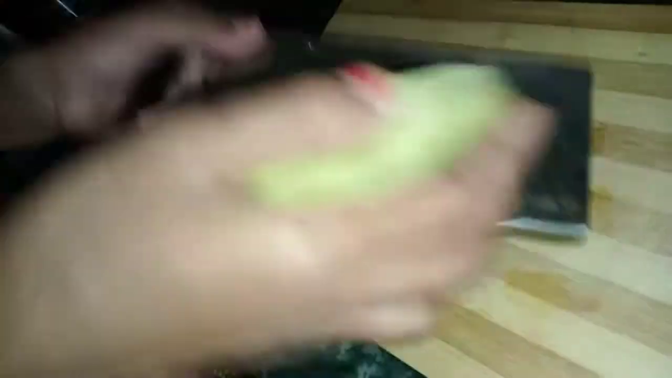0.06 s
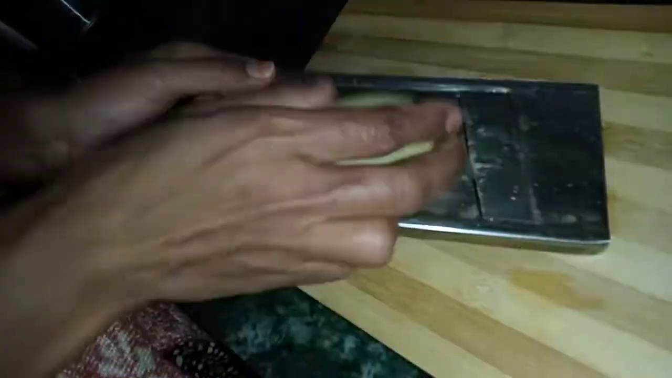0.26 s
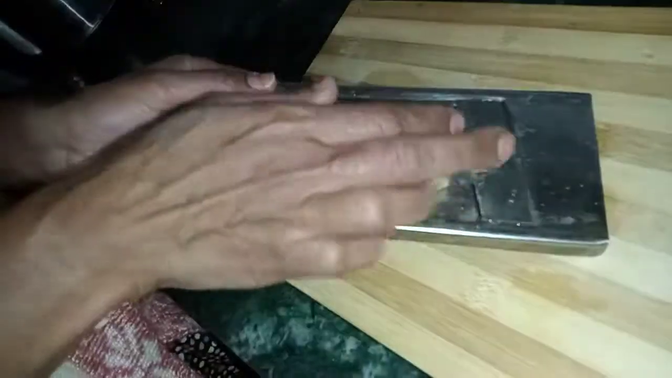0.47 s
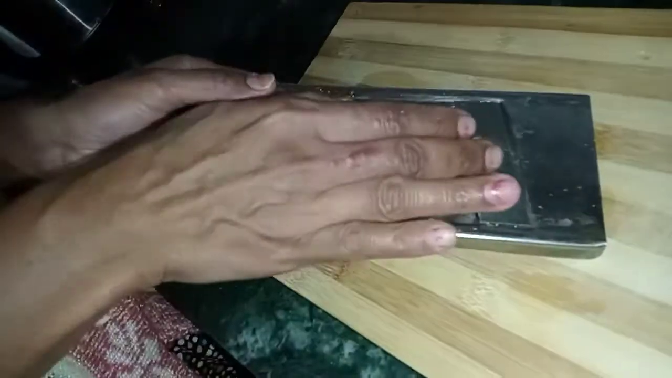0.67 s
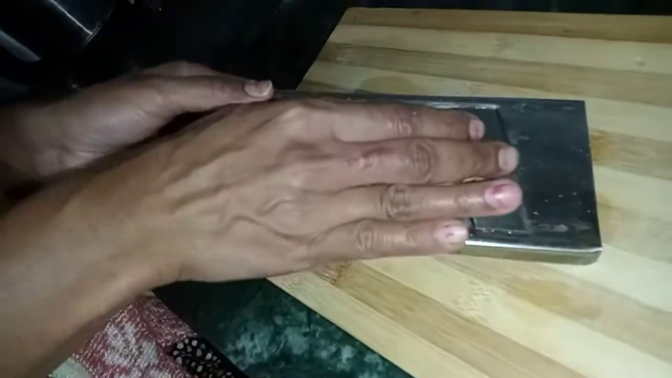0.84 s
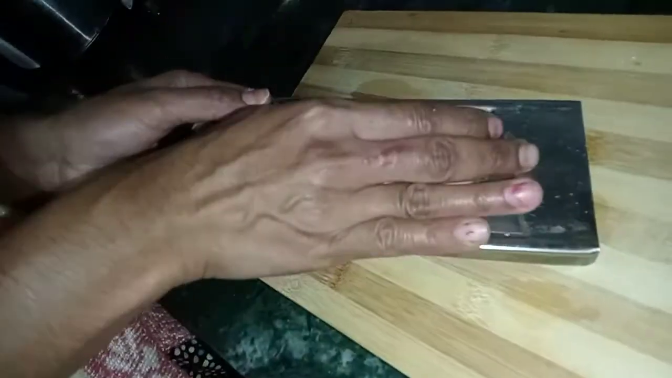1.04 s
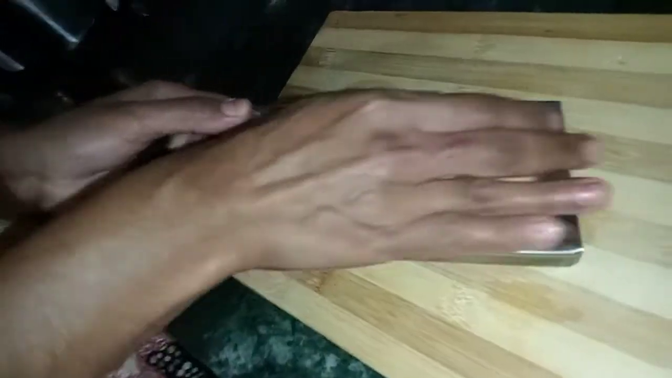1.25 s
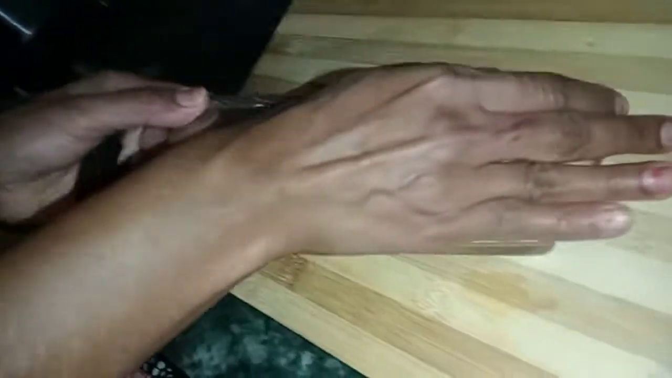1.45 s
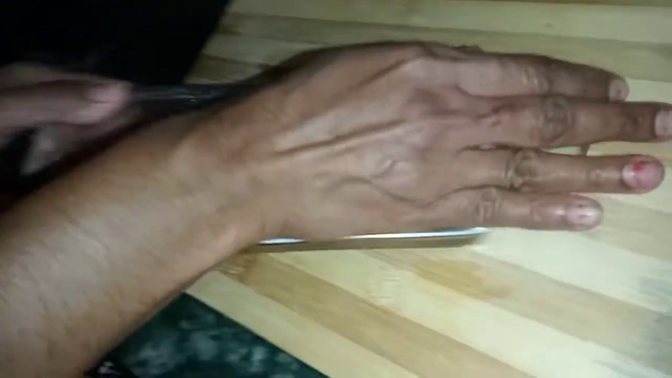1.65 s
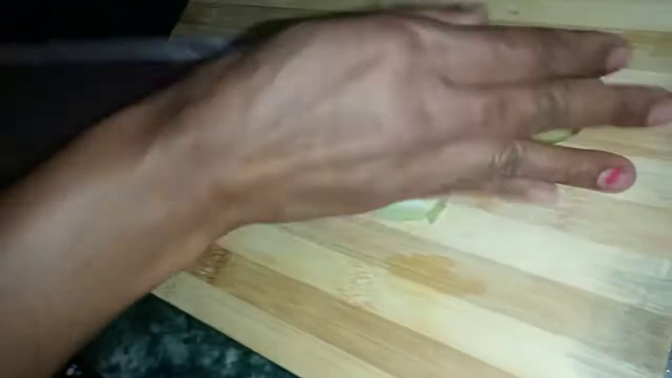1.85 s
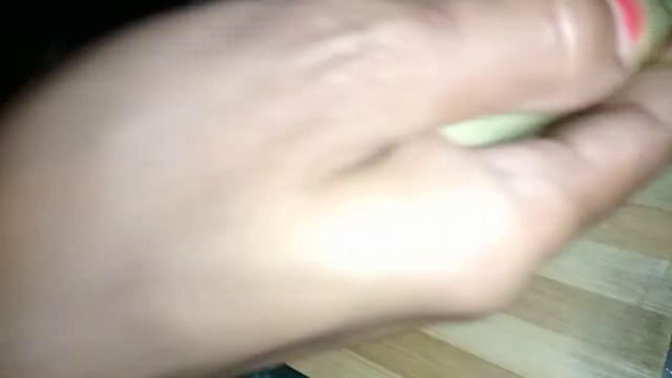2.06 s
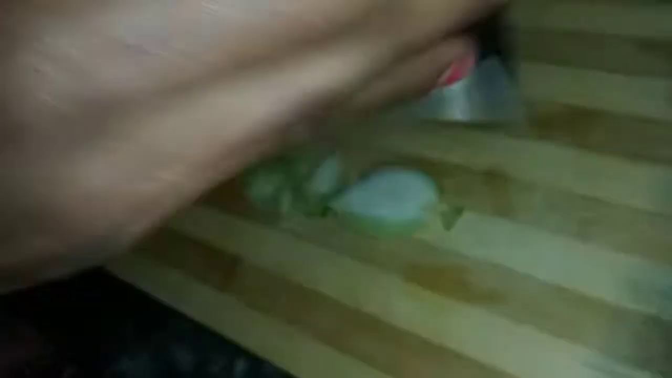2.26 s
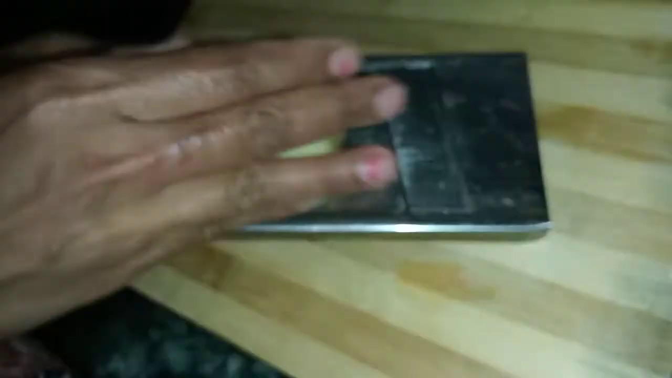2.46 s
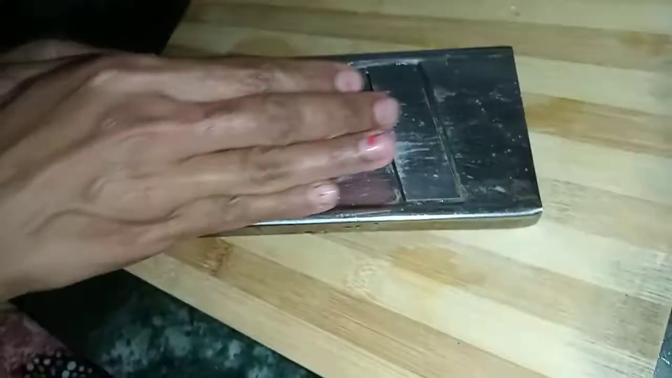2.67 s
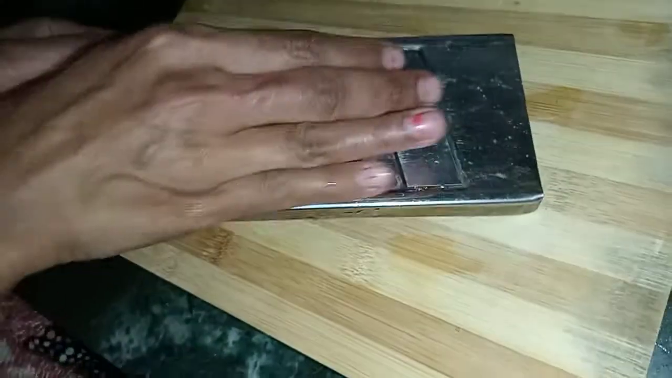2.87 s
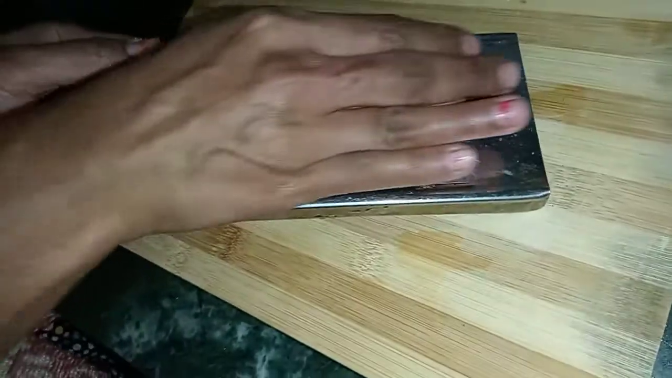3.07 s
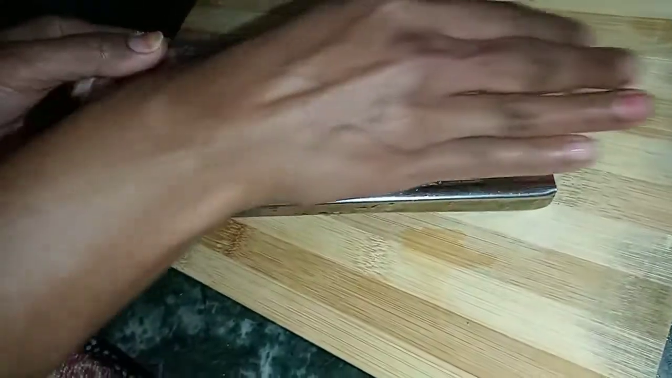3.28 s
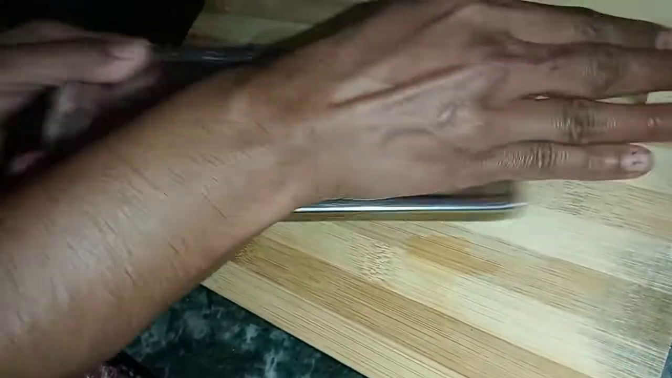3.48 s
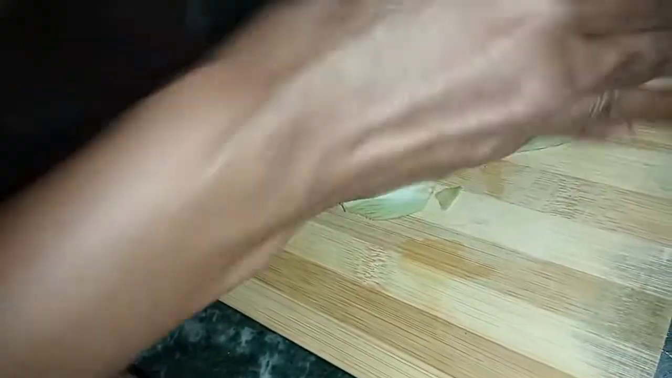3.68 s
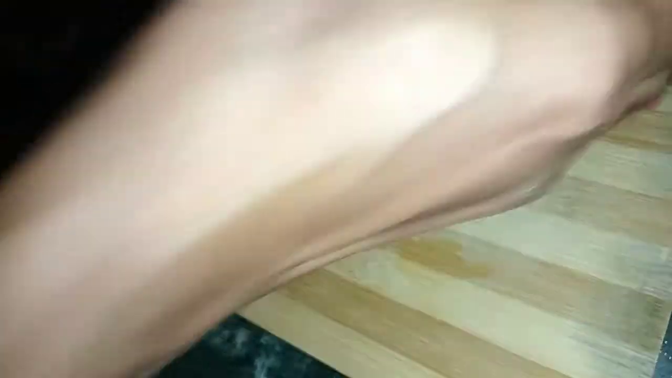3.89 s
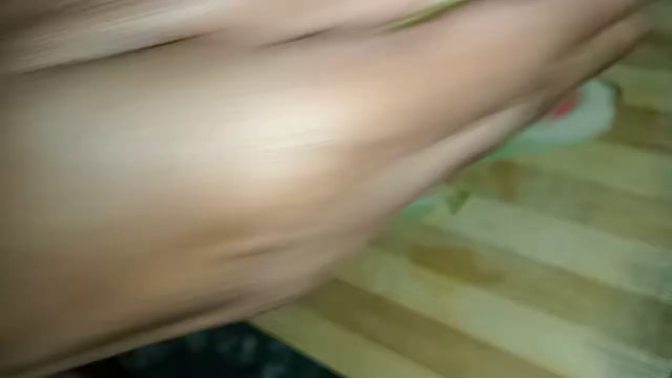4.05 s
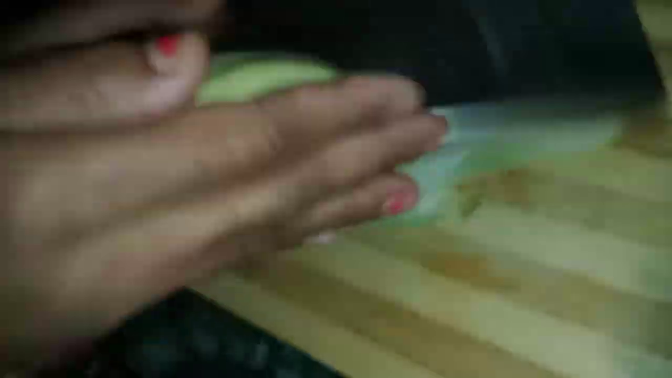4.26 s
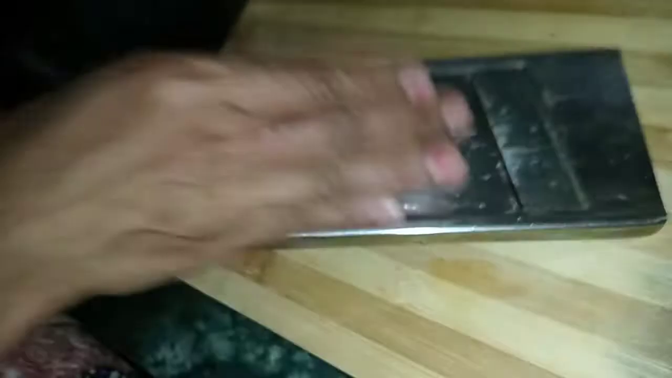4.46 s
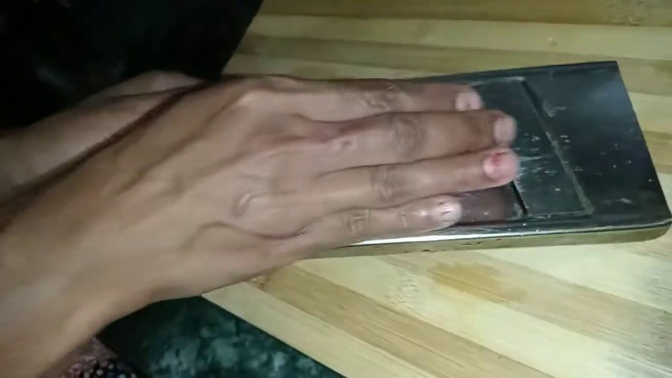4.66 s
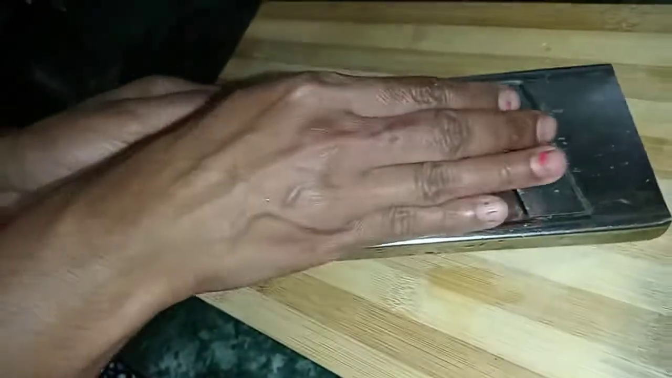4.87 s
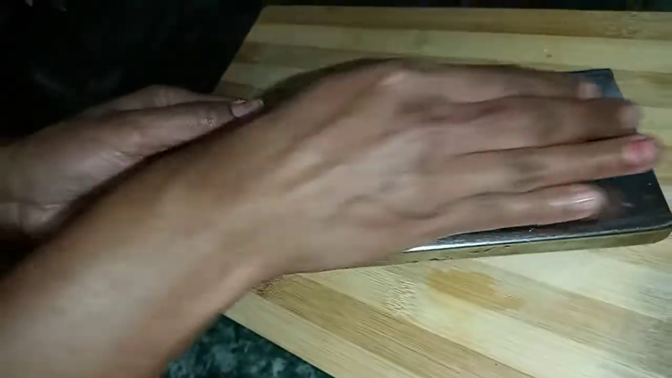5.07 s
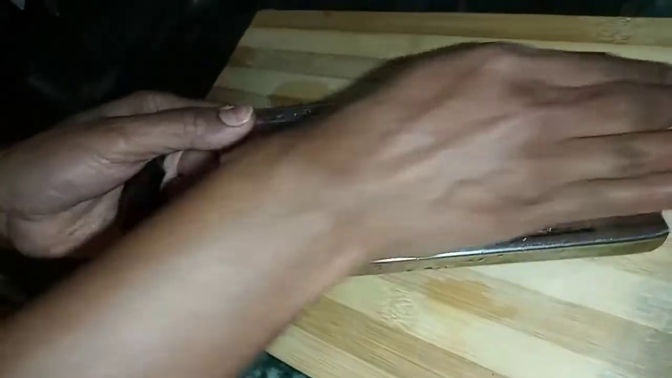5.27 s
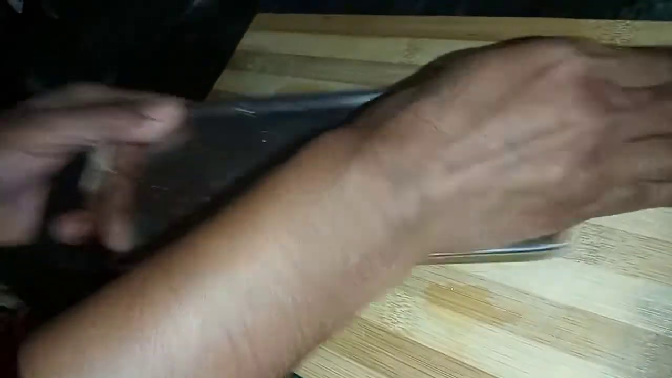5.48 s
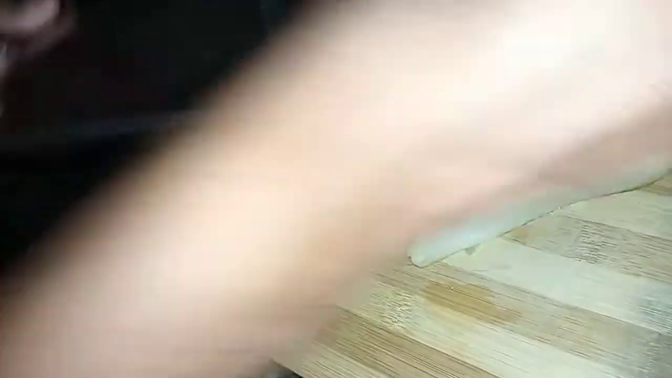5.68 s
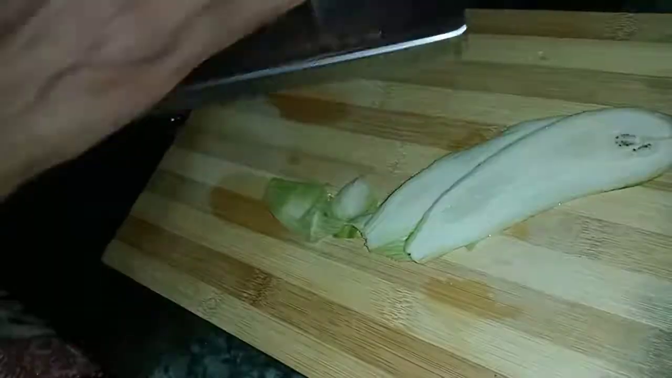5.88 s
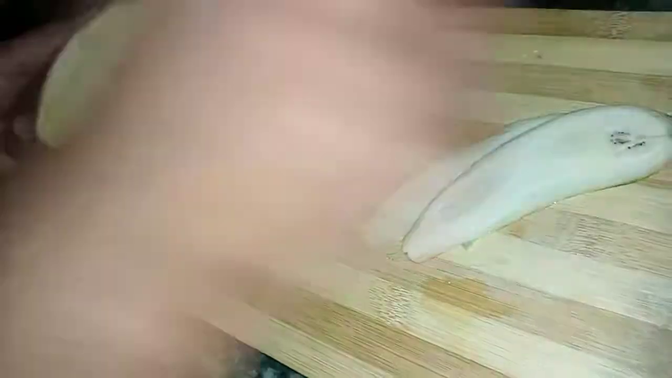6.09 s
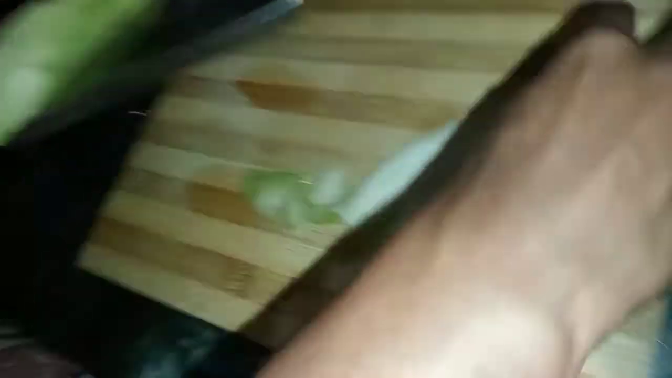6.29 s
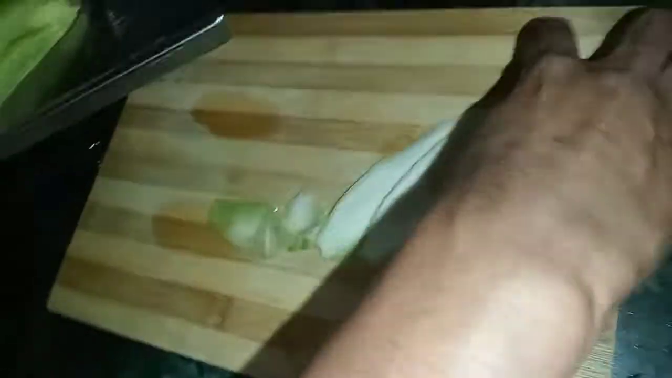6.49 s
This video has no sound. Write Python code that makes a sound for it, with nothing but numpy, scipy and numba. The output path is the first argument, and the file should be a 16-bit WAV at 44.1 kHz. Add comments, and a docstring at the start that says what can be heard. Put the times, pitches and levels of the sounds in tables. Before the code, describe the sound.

A raw banana rasps three times across a ringing steel hand slicer, with wet ticks, crunchy tears and clacking knocks over a faint throbbing fan.

```python
"""A ceiling fan throbs throughout in a small, hard kitchen; now and then fruit knocks on a steel hand slicer.
A raw banana goes over the slicer three times above a wooden board: bursting cells rasp through the ringing plate.
In two of the strokes fibres tear with a crunch through a pocket resonance of falling pitch. Wet ticks snap in and
around the strokes; soft pats, a grazed blade and rubbing fingers come mostly between them; late on, a hand bumps
the microphone. Hits and grains are shaped noise and ringing modes; the fan is coloured air, hum and wavering tone."""
import sys
import numpy as np
from scipy import signal
from scipy.fft import rfft, irfft
from scipy.io import wavfile
from scipy.ndimage import uniform_filter1d
from numba import njit

SR = 44100
rng = np.random.default_rng(int(sys.argv[2]) if len(sys.argv) > 2 else 0)


def materialize(psi):
    """Save the field psi as 16-bit PCM at rate SR to the path in sys.argv[1].

    A 1-D psi becomes a single channel; in a 2-D psi each row is a channel.
    """
    bounded = np.clip(np.atleast_2d(psi).T, -1, 1)
    quanta = np.round(bounded * 32767).astype(np.int16)
    wavfile.write(sys.argv[1], SR, quanta)


N = 288061
T = np.arange(N) / SR
HALF_S = SR // 2  # samples in half a second, room for one short sound


def undb(db):
    """Decibels to gain."""
    return 10 ** (np.asarray(db) / 20)


def unit(x):
    """Scale to rms 1."""
    return x / np.sqrt(np.mean(x ** 2) + 1e-20)


def add(out, s, x):
    """Mix x into out from time s."""
    i = max(int(s * SR), 0)
    out[i:i + len(x)] += x[:N - i]


def through(x, response):
    """Pass x through an impulse response."""
    return signal.fftconvolve(x, response)[:len(x)]


def band(x, lo_hz, hi_hz, order=2):
    """Butterworth band-pass."""
    edges = [lo_hz, min(hi_hz, SR / 2 - 100)]
    return signal.sosfilt(signal.butter(order, edges, "band", fs=SR, output="sos"), x)


def colour(x, points, size=4096):
    """Causal minimum-phase filter through (Hz, dB) points."""
    hz, db = np.transpose(points)
    bins_hz = np.arange(size // 2 + 1) * SR / size
    gain = undb(np.interp(np.log(bins_hz + 1), np.log(hz), db))
    # folding the cepstrum forward in time makes the filter causal
    cepstrum = irfft(np.log(gain))
    cepstrum[1:size // 2] *= 2
    cepstrum[size // 2 + 1:] = 0
    return through(x, irfft(np.exp(rfft(cepstrum))))


@njit
def resonate(x, hz, width):
    """State-variable band-pass whose centre and width (Hz) may move."""
    y, b, l = np.empty(len(x)), 0., 0.
    for i in range(len(x)):
        g, k = np.tan(np.pi * hz[i] / SR), width[i] / hz[i]
        v = (b + g * (x[i] - l)) / (1 + g * (g + k))
        b, l, y[i] = 2 * v - b, l + 2 * g * v, k * v
    return y


def fade(t60):
    """Half a second of exponential decay, falling 60 dB in t60 seconds."""
    return np.exp(-np.log(1000) * T[:HALF_S] / t60)


def ring(modes):
    """Impulse response of (Hz, dB, t60) modes at random phases, with unit energy."""
    y = np.zeros(HALF_S)
    for hz, db, t60 in modes:
        y += undb(db) * fade(t60) * np.sin(2 * np.pi * (hz * T[:HALF_S] + rng.random()))
    return y / np.linalg.norm(y)


def blow(x, db):
    """Set the rms of the first fortieth of a second."""
    return x * undb(db) / np.std(x[:SR // 40])


def grains(per_s, spread_db):
    """Random micro-fractures of uneven size, with rms 1."""
    size = undb(spread_db * np.minimum(rng.exponential(size=N), 4))
    happens = rng.random(N) < per_s / SR
    return unit(happens * size * rng.standard_normal(N))


def walk(per_s):
    """Smooth random wander with rms 1."""
    k = max(int(SR / per_s), 2)
    steps = np.repeat(rng.standard_normal(N // k + 1), k)
    return unit(uniform_filter1d(steps, k)[:N])


RISE_POWER = 1.53  # each movement gathers force slowly at first


def gesture(start, attack, hold, t60):
    """Force of one hand movement: it builds, holds and dies away."""
    rise = np.clip((T - start) / attack, 0, 1) ** RISE_POWER
    return rise * np.exp(-np.log(1000) * np.clip((T - start - attack - hold) / t60, 0, 10))


# Pushes of the fruit along the blade. Each row: start in seconds, attack in seconds, hold in seconds,
# release t60 in seconds, rasp level in dB, wet hiss in dB relative to the rasp,
# plate resonance in Hz, its level in dB.
STROKE_PUSHES = [ (0.873, 0.11, .025, .2, -38.5, -3, 3470, 0),
                 (1.105, 0.11, 0.023, 0.26, -29, -6.5, 3700, -2),
                 (1.223, 0.017, 0.094, 0.6, -32, -12.5, 2900, -10),
                 (1.323, 0.068, 0.056, 0.071, -29, -10.5, 2910, 5),
                 (1.531, 0.061, 0.033, 0.17, -32, -5.5, 2780, -2),
                 (1.604, 0.056, 0.037, 0.42, -27.5, -7.5, 2970, -8),
                 (1.70, 0.047, 0.029, 0.063, -27.5, -7, 4370, 4),
                 (2.789, 0.023, 0.0075, 0.29, -47, -4.5, 3400, -15),
                 (2.9, 0.011, .03, 0.23, -36.5, -2, 3620, -11),
                 (2.908, 0.052, 0.065, 1, -34, -3.5, 3670, 3.5),
                 (3.124, 0.072, 0.11, 0.54, -28.5, -10, 3260, 0.5),
                 (3.36, .12, 0.073, 0.15, -31, -4, 3380, -5),
                 (4.761, 0.029, 0.0074, 0.068, -38, -2.5, 3130, 6),
                 (4.919, .012, .03, 0.12, -53.5, -5, 3380, -5), (4.958, .008, 0.013, .3, -41, 1, 3220, 5),
                 (4.959, 0.068, 0.081, 1, -33, -4, 3540, 1.5),
                 (5.086, 0.16, 0.075, 0.35, -33, -6.5, 3220, 4.5),
                 (5.268, 0.12, 0.037, 0.4, -34, -0.5, 3330, 13.5),
                 (5.41, .05, 0.063, 0.081, -34.5, -7, 2800, -21),
                 (5.928, 0.028, 0.011, 0.082, -45, -4, 3530, 5)]


def pushes():
    """Overlapping pushes add in power; the stronger weigh more in where the plate rings and how much."""
    forces = [undb(db) * gesture(s, attack, hold, t60) for s, attack, hold, t60, db, *_ in STROKE_PUSHES]
    power = np.array(forces) ** 2 + 1e-18
    hiss_db, hz, ring_db = np.transpose(STROKE_PUSHES)[-3:]
    total = power.sum(axis=0)
    force = np.sqrt(total)
    wetness = np.sqrt(undb(hiss_db) ** 2 @ power)
    return force, wetness, hz @ power / total, undb(ring_db) @ power / total


# How unevenly the fruit slips. Each row: rate in slips per second, spread in dB.
SLIP_UNEVENNESS = [(160.6, 0.4), (35.03, 0.54)]
# Resonances of the steel plate under the fruit. Each row: frequency in Hz, width in Hz, level in dB.
PLATE_MODES = [(842, 33, 6.5), (1646, 110, 3.5), (2300, 380, -10), (2710, 55, 4), (3454, 47, 8.5),
               (3610, 42, -7), (4270, 51, 4), (8100, 1200, 8)]
# Overall tone of the rasp. Each row: frequency in Hz, gain in dB.
RASP_TONE = [(60, -17.5), (100, -11.5), (250, -18), (362, -7), (560, -14), (830, -12), (1150, -16),
             (1840, -11), (2800, 0.5), (3600, -0.5), (4600, -4), (6000, -13.5), (8400, -5), (10300, -7.5),
             (13500, -5), (15500, -13)]
PLATE_DB, GRIP_WIDTH_HZ = -8.5, 540
FLESH_RE_HISS_DB = -7.5  # the soft body of the fruit follows the wet hiss


def rasp():
    """Cells burst along the blade in uneven slips; the plate rings, juice hisses and the flesh adds body."""
    force, wetness, grip_hz, grip_ring = pushes()
    slips = undb(sum(db * walk(per_s) for per_s, db in SLIP_UNEVENNESS))
    cells = grains(per_s=9000, spread_db=-1.0) * slips
    plate = np.zeros(N)
    for hz, width, db in PLATE_MODES:
        # each resonance comes and goes as the fruit damps a different part of the plate
        damping = undb(db + 3.4 * walk(18))
        plate += damping * resonate(cells, np.full(N, 1. * hz), np.full(N, 1. * width))
    pressed_hz = grip_hz * (1 + 0.039 * walk(24.8))
    pressed = resonate(cells, pressed_hz, np.full(N, 1. * GRIP_WIDTH_HZ))
    sound = colour(cells + undb(PLATE_DB) * plate + grip_ring * pressed, RASP_TONE)
    steel = unit(band(sound, 2010, 5200, order=3))
    hiss = unit(band(sound, 5720, 20000, order=3))
    flesh = unit(band(sound, 64, 1380, order=3))
    return force * steel + wetness * (hiss + undb(FLESH_RE_HISS_DB) * flesh)


# The slice tears free and the pocket under it opens. Each row: start in seconds, attack in seconds,
# hold in seconds, release t60 in seconds, level in dB, first pitch in Hz, board ring in dB, crackle in dB.
SLICE_TEARS = [(1.611, 0.028, 0.033, .15, -25, 1651, 0, 4.5), (1.709, 0.01, 0.065, .13, -38, 400, -2.5, 7),
               (5.381, .022, 0.03, 0.072, -29.5, 3123, -9, 9.5)]
# Modes of the wooden board. Each row: frequency in Hz, level in dB, t60 in seconds.
BOARD_MODES = [(250, -5, .18), (303, -1, .16), (495, 2, .26), (818, -6, .12), (895, 2, .12), (930, 2, .12),
               (1173, -4, .14)]
POCKET_HALVES_S, POCKET_OPEN_HZ = .02, 296  # the pitch drops an octave per step until fully open
POCKET_DB, SQUEAL_DB = -7.5, -5.5


def tears():
    """Fibres snap into an opening pocket of falling pitch; flesh squeals at it and the board rings along."""
    out = np.zeros(N)
    for s, attack, hold, t60, db, first_hz, ring_db, crackle_db in SLICE_TEARS:
        falling_hz = first_hz * .5 ** (np.maximum(T - s, 0) / POCKET_HALVES_S)
        hz = np.maximum(falling_hz, POCKET_OPEN_HZ)
        force = undb(db) * gesture(s, attack, hold, t60)
        snaps = grains(per_s=2900, spread_db=-1.4) * force
        width = 120 + .14 * hz
        # two resonators in a row, levelled so that a wide pocket is no louder than a narrow one
        pocket = resonate(resonate(snaps, hz, width), hz, width) * np.sqrt(SR / width * 2 / np.pi)
        squeal_hz = hz * (1 + .07 * walk(300))
        squeal = force * undb(2.5 * walk(200)) * np.sin(2 * np.pi * np.cumsum(squeal_hz) / SR)
        crackle = band(grains(per_s=2500, spread_db=0.0) * force, 1520, 4270)
        out += undb(POCKET_DB) * pocket + undb(SQUEAL_DB) * squeal
        out += undb(ring_db) * through(snaps, ring(BOARD_MODES))
        out += undb(crackle_db) * crackle
    return band(out, 185, 14500, order=3)


# Fruit and knuckles knock on the slicer. Each row: time in seconds, level in dB, low thud in dB,
# rattle as each bounce's strength relative to the last (0-1), lower edge of the boosted plate band in Hz,
# that band's added level in dB, contact cut-off in Hz.
SLICER_KNOCKS = [(0.1628, -27, 6.5, 0.49, 1133, 3.5, 6600), (2.4504, -23.5, -3, 0.34, 2230, 0, 5330),
                 (4.4747, -33.5, 5, 0.78, 3340, 9, 4300), (4.5242, -26, 1, .5, 3140, 11, 5100),
                 (4.601, -35.5, 6, 0.1, 2800, 2, 4470), (5.765, -48, 1, 1, 2410, 18, 6000),
                 (5.974, -42, 12, 1, 3580, -7, 4430)]
# Tone of the clatter. Each row: frequency in Hz, gain in dB.
KNOCK_TONE = [(100, -17), (230, 2), (400, -2), (650, -5.5), (1050, -2.5), (1600, 0), (2400, 8), (3400, 4.5),
              (4400, -3.5), (5300, -12.5), (6200, -23), (8300, -12.5), (15000, -24)]
# Ringing modes of the slicer's steel. Each row: frequency in Hz, level in dB, t60 in seconds.
STEEL_MODES = [(364.5, 10.5, 0.72), (880, -24, 0.22), (1090, -22, 0.043), (1350, -13, 0.043),
               (1720, -11, 0.12), (2090, 11, 0.3), (2160, -20, 0.18), (2410, 13, 0.11), (2600, -42, .16),
               (3210, -2, 0.28), (3710, 35, 0.026), (3550, 7, 0.076)]


def knocks(bounce_s=.0046, count=4):
    """The slicer chatters in quick bounces: a crack for each, a dense clatter and the ring of the steel."""
    out = np.zeros(N)
    clatter_power = (fade(0.033) + undb(-0.5) * fade(0.14)) ** 2
    for s, db, thud_db, rattle, hz, peak_db, top_hz in SLICER_KNOCKS:
        push = np.zeros(HALF_S)
        bounces = np.arange(count)
        jitter = .25 * rng.uniform(-0.78, 1, count) * (bounces > 0)
        times = bounce_s * (bounces + jitter)
        push[(times * SR).astype(int)] = np.clip(rattle, 0, 1) ** bounces
        # every bounce is a fresh crack, and the clatter dies away behind it
        loudness = np.sqrt(np.abs(through(push ** 2, clatter_power)))
        crack = rng.standard_normal(HALF_S) * loudness
        hit = unit(colour(crack, KNOCK_TONE)) + undb(-9.0) * unit(through(push, ring(STEEL_MODES)))
        hit = hit + undb(peak_db) * band(hit, hz, hz * 1.034, order=1)
        hit = hit + (undb(thud_db) - 1) * band(hit, 150, 1500, order=1)
        # soft flesh cushions the contact and dulls it
        add(out, s, blow(band(hit, 68, top_hz), db))
    return out


# Sticky flesh lets go of the steel. Each row: time in seconds, peak in dB,
# reference pitch in Hz (the band runs from 0.55 to 1.6 times it).
FLESH_TICKS = [(0.8, -32.5, 8300), (0.919, -26.5, 7800), (0.9644, -25, 6460), (1.2164, -15.5, 4250),
               (2.0424, -34, 6150), (2.9104, -30, 5470), (4.9296, -36, 7800), (4.965, -28.5, 6800),
               (5.636, -24.5, 5650), (6.217, -45, 3700), (6.2613, -28, 9600), (6.275, -36, 9700)]


def ticks():
    """Tiny wet snaps: noise in a pitched band that dies within a few milliseconds."""
    out = np.zeros(N)
    for s, db, hz in FLESH_TICKS:
        snap = band(rng.standard_normal(HALF_S) * fade(0.0064), hz * 0.55, hz * 1.6)
        add(out, s, undb(db) * snap / np.abs(snap).max())
    return out


# Soft pats on the board. Each row: time in seconds, level in dB, pitch in Hz, t60 in seconds.
BOARD_PATS = [(0.307, -45.5, 339, 0.12), (5.940, -51.5, 1273, 0.16), (5.972, -37, 346.6, 0.22),
              (5.997, -45, 623, 0.061), (6.025, -46, 179, 0.52)]


def pats():
    """Soft flesh lands on wood: one mode and a dull slap."""
    out = np.zeros(N)
    for s, db, hz, t60 in BOARD_PATS:
        slap = band(rng.standard_normal(HALF_S) * fade(0.028), 160, 780)
        # soft contact: the mode takes a few milliseconds to build
        mode = ring([(hz, 0, t60)]) * (1 - fade(.015))
        add(out, s, blow(mode + undb(-7.5) * slap / np.linalg.norm(slap), db))
    return out


# A fingernail grazes the blade. Each row: time in seconds, level in dB, drag length in seconds,
# scratch reference pitch in Hz (its band lies just below), scratch in dB relative to the ring.
NAIL_GRAZES = [(0.067, -50.5, 0.025, 5380, 1.5), (0.543, -32.5, 0.032, 4600, -9.5)]
# Ringing modes of the thin blade. Each row: frequency in Hz, level in dB, t60 in seconds.
BLADE_MODES = [(2823, 3.5, 0.061), (2850, -10, 0.083), (3170, -15, 0.065), (3400, -6.5, 0.08),
               (3760, -13, .09), (4016, -6, 0.073), (4660, -2.5, 0.023), (5400, -27, .08),
               (8260, -17, 0.025)]


def grazes():
    """A brief rough scratch sets the thin blade ringing."""
    out, t = np.zeros(N), T[:HALF_S]
    for s, db, length, hz, scratch_db in NAIL_GRAZES:
        # the nail drags evenly for a moment, then lifts off
        drag = (1 - np.exp(-t / 0.0017)) / np.cosh(np.minimum(t / length * 1.04, 50))
        scratch = rng.standard_normal(HALF_S) * drag
        pitched = unit(band(scratch, hz * 0.86, hz * 0.93, order=1))
        rough = pitched + undb(-17.5) * unit(band(scratch * fade(0.14), 2700, 13500))
        ringing = unit(through(scratch, ring(BLADE_MODES)))
        add(out, s, blow(ringing + undb(scratch_db) * unit(rough), db))
    return out


# Damp fingers shift their hold, mostly between strokes. Each row: start in seconds, hold in seconds,
# level in dB.
FINGER_RUBS = [(0.412, 0.29, -62.5), (0.68, .09, -53), (1.793, 0.045, -63), (1.933, 0.026, -64.5),
               (2.574, 0.023, -62), (2.71, 0.043, -56), (3.596, 0.031, -52), (3.745, .03, -58),
               (4.659, 0.22, -61), (4.735, .01, -49), (5.751, 0.017, -60.5), (6.2, 0.046, -59.5)]
RUB_ATTACK_S, RUB_T60_S, GRIP_REST_DB = 0.021, 0.23, -71.5


def handling():
    """Skin rubs over damp steel with a faint sticky crackle."""
    rub = unit(band(grains(per_s=5000, spread_db=-1), 1740, 3850))
    crackle = undb(-16) * unit(band(grains(per_s=400, spread_db=2.5), 7000, 14000, order=1))
    rubs = sum(undb(db) * gesture(s, RUB_ATTACK_S, hold, RUB_T60_S) for s, hold, db in FINGER_RUBS)
    return (rub + crackle) * (undb(GRIP_REST_DB) + rubs)


# A hand bumps the microphone. Each row: time in seconds, swing level in dB,
# reference pitch in Hz (the swing falls from 1.43 to 0.24 times it).
MICROPHONE_BUMPS = [(6.2267, -31.5, 450), (6.2637, -16, 290)]


def bumps():
    """A touch on the microphone: a sharp tick with a heavy swing that slows as it dies."""
    out, t = np.zeros(N), T[:HALF_S]
    for s, db, hz in MICROPHONE_BUMPS:
        pitch = hz * (0.24 + 1.19 * np.exp(-t / 0.0032))
        swing = -np.sin(2 * np.pi * np.cumsum(pitch) / SR) * fade(0.044)
        tick = np.exp(-((t - .0002) / .0001) ** 2)
        # a harder bump has relatively more tick
        add(out, s, undb(db) * (swing + undb(db + 20) * tick))
    return out


# Tone of the moving air in the kitchen. Each row: frequency in Hz, gain in dB.
AIR_TONE = [(30, -31), (50, -27), (85, -8.5), (170, -14), (215, -21.5), (290, -13.5), (420, -16.5),
            (606, -24), (830, -25.5), (1400, -36.5), (3070, -32.5), (4300, -40), (6000, -56.5), (8500, -36),
            (10500, -48), (15500, -48)]
AIR_DB = -59.5
FAN_TURNS_PER_S, FAN_FIRST_S = 5.262, 0.06
THROB_HZ, THROB_DB = 363.4, -56.5


def fan():
    """Moving air that drifts in level, a wavering motor hum and a hollow throb on every turn."""
    air = unit(colour(rng.standard_normal(N), AIR_TONE)) * undb(AIR_DB + 2.3 * walk(4.6))
    turn = (.5 + .5 * np.cos(2 * np.pi * FAN_TURNS_PER_S * (T - FAN_FIRST_S))) ** 2
    tone = np.sin(2 * np.pi * np.cumsum(THROB_HZ * (1 + 0.051 * walk(80))) / SR)
    throb = tone * turn * undb(THROB_DB + 3.0 * walk(30))
    hum = unit(band(rng.standard_normal(N), 174.4, 184.5)) * undb(-65.5)
    return air + throb + hum


# First reflections off the board, the counter and the wall tiles.
# Each row: delay in seconds, level in dB relative to the direct sound.
FIRST_REFLECTIONS = [(.0013, -19), (.0031, -24.5), (.0052, -18.5)]


def kitchen(x, wet_db, t60_low=0.26, t60_high=0.26):
    """Direct sound, close reflections that ripple the spectrum, then a dense two-band tail."""
    noise = rng.standard_normal(HALF_S)
    tail = band(noise, 200, 4640) * fade(t60_low)
    tail += undb(-4) * band(noise, 3600, 12600) * fade(t60_high)
    tail *= 1 - np.exp(-T[:HALF_S] / 0.00051)
    # level the tail by its energy in the middle of the spectrum
    tail /= np.sqrt(np.sum(band(tail, 500, 4000) ** 2) * SR / 7000)
    first = np.zeros(HALF_S)
    first[0] = 1
    for delay, db in FIRST_REFLECTIONS:
        first[int(delay * SR)] += undb(db)
    response = first / np.linalg.norm(first) + undb(wet_db) * tail
    return through(x, response) / np.hypot(1, undb(wet_db))


def scene():
    """Slicer and board sound into the kitchen; the bumps reach the microphone directly, the fan is added dry."""
    rubbed = kitchen(rasp() + ticks() + handling(), wet_db=-5)
    struck = kitchen(knocks() + tears() + grazes() + pats(), wet_db=-7.5)
    return (rubbed + struck + bumps() + fan())[None]


TOP_HZ = 15850


def record(dry):
    """The phone drops the deep bass, rounds the tallest peaks and cuts the top."""
    thin = signal.sosfilt(signal.butter(3, 45, "high", fs=SR, output="sos"), dry)
    ceiling = .4
    rounded = ceiling * np.tanh(thin / ceiling)
    return signal.sosfilt(signal.ellip(10, .2, 80, TOP_HZ, fs=SR, output="sos"), rounded)


dry = scene()
out = record(dry)
materialize(out)
```